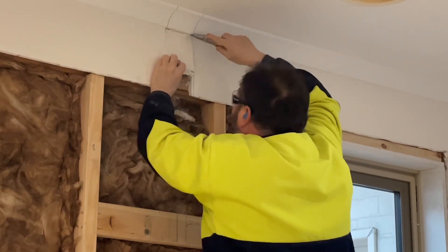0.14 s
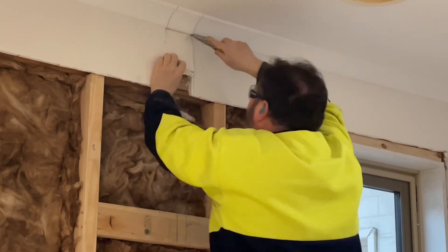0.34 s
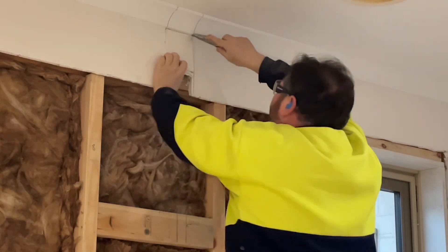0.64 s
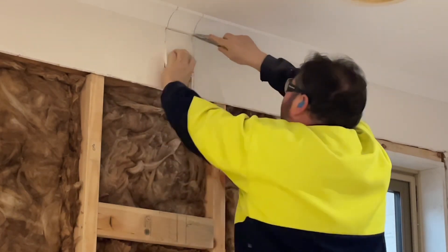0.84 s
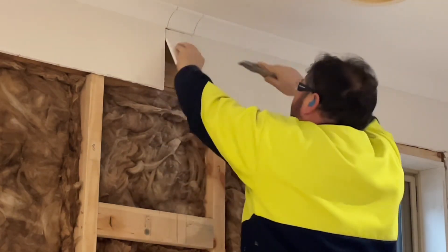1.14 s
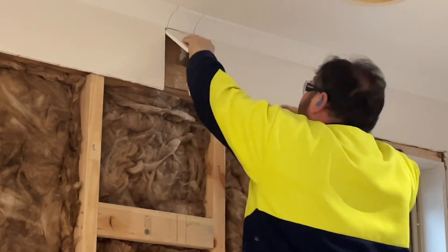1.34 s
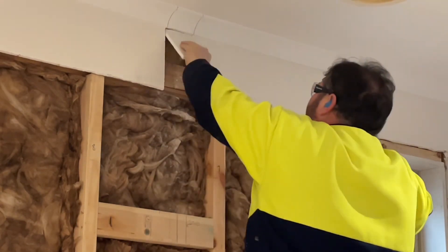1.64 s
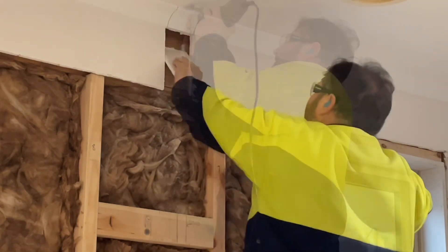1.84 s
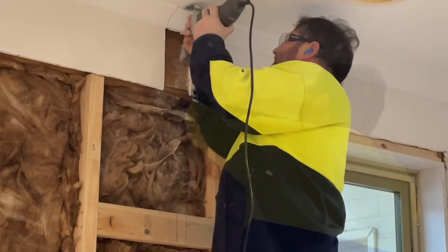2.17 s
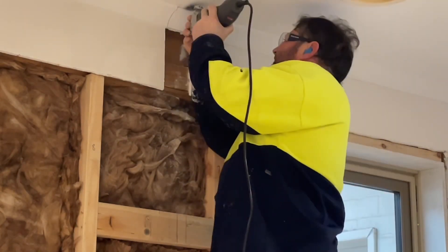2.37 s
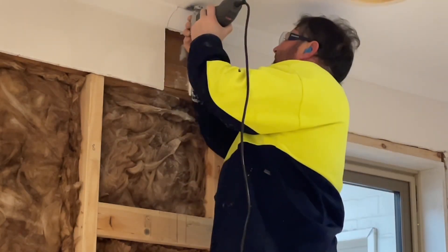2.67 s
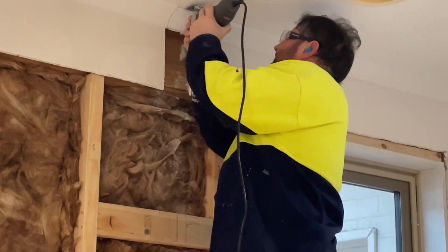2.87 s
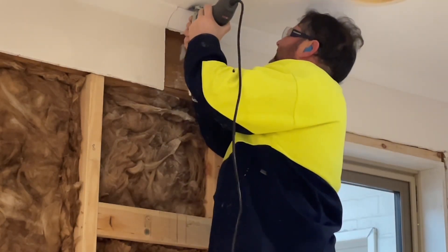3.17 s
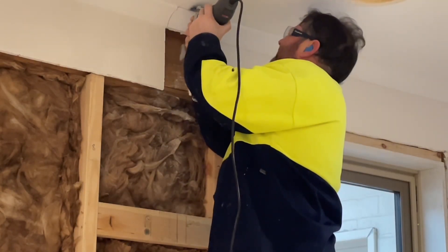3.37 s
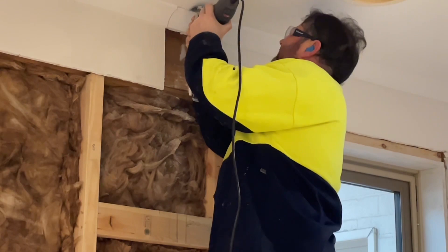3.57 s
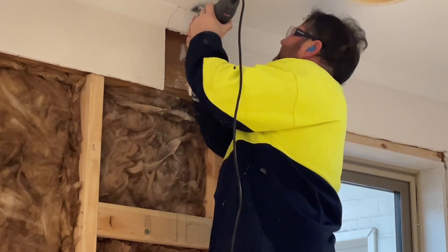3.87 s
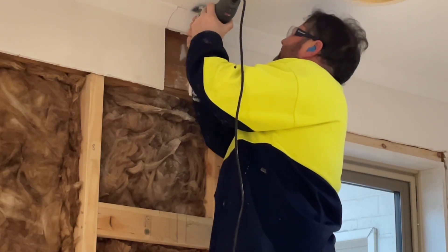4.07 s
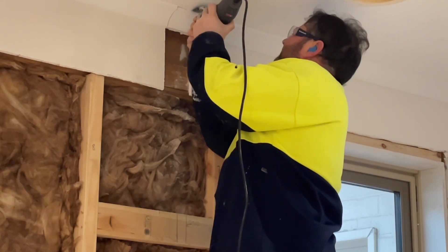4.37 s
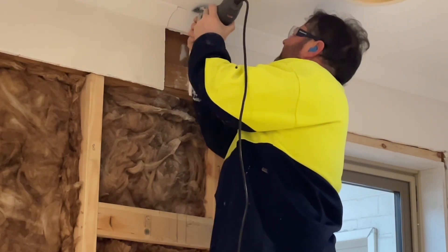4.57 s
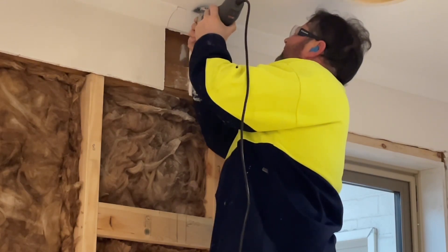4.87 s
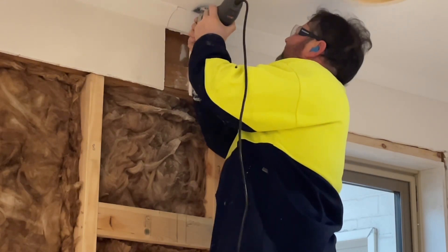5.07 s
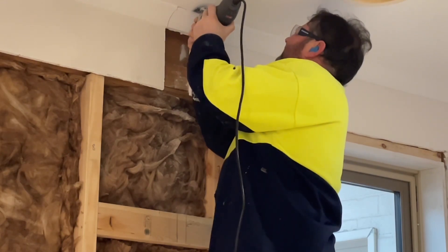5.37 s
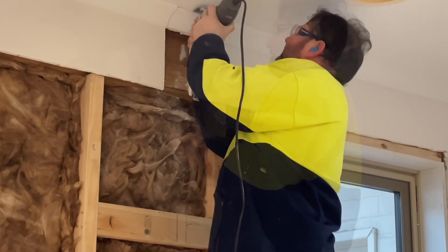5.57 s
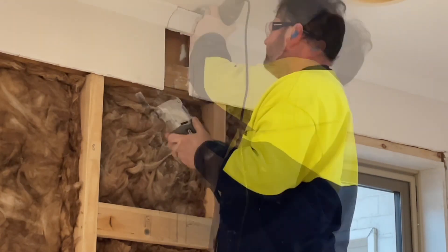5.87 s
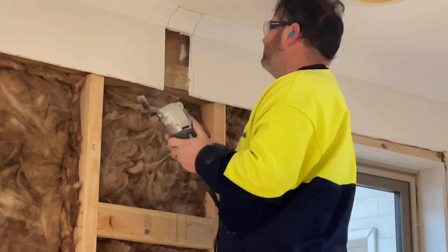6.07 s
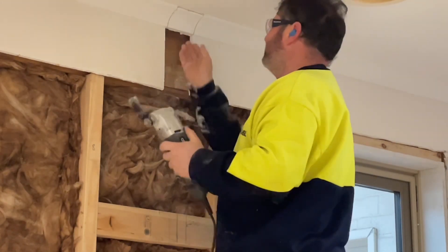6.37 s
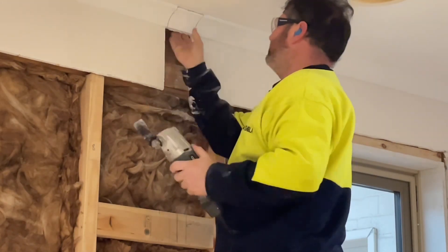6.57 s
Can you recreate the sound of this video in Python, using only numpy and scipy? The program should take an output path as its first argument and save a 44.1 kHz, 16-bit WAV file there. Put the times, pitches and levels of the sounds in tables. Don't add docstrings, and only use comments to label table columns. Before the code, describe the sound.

Close stereo pickup of wall work: very soft scraping and little knocks, then a sudden brittle snap and boomy clatter against the wall cavity. It blends straight into a loud, steady, nasal power tool buzz with crumbling grit and flickering overtones. Near the end the motor coasts down, duller and lower, still sounding at the cut-off, with short room reflections.

```python
import sys
import numpy as np
from scipy import signal
from scipy.fft import rfft, irfft, next_fast_len
from scipy.io import wavfile
from scipy.ndimage import uniform_filter1d, map_coordinates

SR = 44100
rng = np.random.default_rng(int(sys.argv[2]) if len(sys.argv) > 2 else 0)


def field_ratio(decibels):
    return 10 ** (np.asarray(decibels, dtype=float) / 20)


def to_wav(s):
    ch = np.atleast_2d(s).T
    pcm = np.round(np.clip(ch, -1, 1) * 32767)
    wavfile.write(sys.argv[1], SR, pcm.astype(np.int16))


N = 296263
STEP = 64
TIME = np.arange(N)
ON_S, OFF_S = 1.767, 5.965
FREE_HZ = 278

# t/s, level/dB
ROOM_LEVEL = [(0, -51.5), (.5, -55), (1, -54), (1.7, -51.5), (2.2, -67), (5.8, -66.5), (6.1, -58.5),
              (6.72, -62)]
# f/Hz, level/dB per Hz
RUMBLE_COLOUR = [(15, -26), (30, -20), (60, -3.5), (100, -3.5), (160, -13), (260, -13), (380, -16),
                 (480, -21.5), (700, -34.5), (1200, -60)]
# f/Hz, level/dB per Hz
HISS_COLOUR = [(300, -2), (800, 2), (1300, -1), (3600, -2.5), (6500, -2), (9000, -2.5), (12000, -17.5),
               (15500, -14)]
# f/Hz, level/dB over the rumble
MACHINE_HUM = [(100, -1.5), (295, -12.5)]
# f/Hz, t60/s
WALL_DECAY = [(200, 0.37), (2000, 0.51), (10000, 0.037)]
# t/s, peak level/dB, f/Hz, t60/s
BOARD_TICKS = [(0.189, -45, 708, 0.015), (0.213, -41, 2610, 0.012), (0.224, -44, 750, 0.028),
               (0.853, -36, 3500, 0.012), (0.906, -38, 1920, 0.022), (0.913, -38, 2900, 0.012),
               (0.92, -44, 1510, .015), (1.215, -45, 821, 0.012), (1.464, -40, 1650, 0.014),
               (1.708, -22, 1570, 0.012), (1.716, -13.5, 1250, 0.014), (1.729, -12.5, 820, 0.0098),
               (1.744, -21, 1110, 0.018), (1.755, -22.5, 1280, 0.011), (1.993, -29, 337, 0.059)]
# t/s, hiss level/dB, scrape level/dB, rise/s, t60/s
DRY_RUBS = [
    (0.613, -43.5, -65, 0.018, 0.37),
    (.85, -66, -50.5, .003, 0.11),
    (.905, -64, -56.5, .006, 0.61),
    (.215, -68, -51, 0.0046, .14),
    (1.1, -72, -66, .02, .3),
    (1.21, -70, -54, .01, 0.33),
    (1.46, -72, -52, .005, .15),
    (1.713, -43, -37, 0.0014, 0.33),
]
# f/Hz, level/dB per Hz
SKIN_COLOUR = [(800, -17), (2000, -7), (3500, -3.5), (7000, -1), (11000, -1), (15000, -8)]
# f/Hz, level/dB per Hz
EDGE_COLOUR = [(200, -6), (700, 6), (1300, -4), (2400, -3), (3500, -4.5), (8000, -27)]
# t/s, peak level/dB
PIECE_THUDS = [(0.62, -57), (0.916, -41), (1.721, -30), (1.737, -16.5), (1.762, -13.5), (1.771, -24),
               (1.78, -16.5), (1.791, -17.5), (1.81, -18.5), (1.83, -20), (1.847, -39), (1.877, -43),
               (1.995, -29), (2.019, -56)]
# f/Hz, width/Hz, level/dB
CAVITY_MODES = [(95, 73, -13), (168.6, 18, 5.5), (257, 28, -0.5), (384, 100, -6.5), (560, 110, -14.5)]
# f/Hz, level/dB
STROKE_COLOUR = [(500, -21), (800, -5.5), (1100, -12), (1400, -7), (1650, -6.5), (1900, -4.5), (2170, 0.5),
                 (2440, -1.5), (2710, 1.5), (3000, -5.5), (4000, -4), (5100, -6.5), (5600, -11.5),
                 (10000, -13.5)]
# f/Hz, level/dB
GRIT_COLOUR = [(200, -26), (450, -12.5), (750, 0.5), (1300, -6), (2200, -1.5), (3600, -1), (5000, -0.5),
               (6500, -3.5), (9000, -5), (10500, -8.5), (12500, -14), (15500, -12.5)]
# f/Hz, width/Hz, level/dB
HOUSING_RINGS = [(8200, 50, -61), (10200, 50, -66), (11100, 50, -70)]
# t/s, strokes f/Hz
MOTOR_SPEED = [(1.8, 278.1), (2.01, 277.0), (2.39, 270.8), (2.73, 272.9), (2.93, 275.5), (3.62, 270.7),
               (3.79, 269.7), (3.99, 266.1), (4.22, 266.6), (4.35, 267.7), (4.53, 267.6), (4.79, 269.4),
               (5.11, 265.5), (5.22, 267.1), (5.36, 271.5), (5.96, 277.7)]
# t/s, level/dB, rasp level/dB
BLADE_PUSH = [(1.8, -34, 1.5), (1.84, -43.5, 4), (1.95, -33, -1.5), (2.26, -27, 0.5), (3.03, -27.5, 1),
              (3.09, -26.5, -0.5), (3.2, -26.5, -1.5), (4.21, -26, -1.5), (4.28, -26, -2.5),
              (4.91, -27, -0.5), (5.06, -25.5, 0), (5.22, -28.5, 1.5), (5.52, -25.5, 0),
              (5.65, -28.5, -1.5), (6.04, -26, -1), (6.29, -32.5, 4.5), (6.37, -33.5, -1.5),
              (6.72, -37, -1)]
# t/s, length/s, gain level/dB
BLADE_BITES = [(2.166, 0.068, 3), (2.29, 0.078, 3.5), (2.651, 0.17, 3), (3.1, 0.21, 3.5),
               (3.596, 0.57, 2.5), (3.995, 0.11, 3), (4.2, .14, 5), (4.755, 0.12, 3), (4.976, 0.055, 2.5),
               (5.155, 0.04, 1.5), (5.492, 0.067, -1.5), (6.09, 0.09, 1), (6.235, 0.092, 3.5)]
SINGING_OVERTONES = [2, 4, 5, 6, 8, 9, 10, 11, 13, 14, 15, 16, 18, 19]
# t/s, length/s, gain level/dB
SINGING_MOMENTS = [
    [(5.045, 0.59, 11.5)],
    [(5.35, 0.49, 8.5), (6.12, 0.34, 10.5)],
    [(3.075, 0.96, 7.5)],
    [(3.07, 0.27, 9), (3.6, 0.18, 8), (4.76, .23, 7.5), (5.08, 0.13, 9), (5.5, 0.076, 12)],
    [(1.84, 0.31, -15), (2.507, 0.23, 5), (3.19, 0.29, 6.5), (3.66, 0.27, 7), (4.45, 0.28, -3),
     (4.72, 0.16, 8), (5.03, 0.27, 8.5), (6.06, 0.068, 9)],
    [(5.85, 0.24, 9.5), (6.085, 0.053, 9.5)],
    [(2.03, 0.52, 4), (5.4, 0.33, -13)],
    [(5.7, 0.55, -7)],
    [(2, .24, 1.5), (5.64, 0.15, 12.5)],
    [(3.54, 0.21, 11)],
    [(2.44, 0.43, 10.5)],
    [(5.917, 0.26, 9.5)],
    [(5.849, .2, 7.5)],
    [(3.986, 0.33, 9.5), (4.8, 0.74, 11)],
]
# f/Hz, left-right likeness
PORT_LIKENESS = [(60, 0.97), (250, 0.77), (700, 0.57), (1000, 0.033), (1400, 0.92), (1800, 0.22),
                 (2300, 0.81), (2700, 1), (6000, 1), (7200, 0.93), (8200, 1), (9700, 0.85), (11300, 1),
                 (13100, 0.55), (14300, 0.96)]
# f/Hz, half turns
PORT_LEAD = [(0, 0), (6150, 0), (7200, .5), (7750, 1), (8750, 1), (9800, 1.5), (10700, 2), (12200, 2),
             (13000, 2.5), (13900, 3), (15400, 3), (15800, 3.1), (17000, 3.5)]


def unit(x):
    return x / np.sqrt(np.mean(x ** 2) + 1e-20)


def along(points, hz):
    f, v = np.transpose(points)
    return np.interp(np.log(hz + 1), np.log(f + 1), v)


def curves(rows):
    s, *cols = np.transpose(rows)
    return [np.interp(TIME / SR, s, c) for c in cols]


def wobble(rate):
    return map_coordinates(rng.standard_normal(400), [np.arange(0, N + STEP, STEP) * rate / SR])


def full(coarse):
    return np.interp(TIME, np.arange(len(coarse)) * STEP, coarse)


def bumps(s, length, t):
    return 1 / (1 + ((t - s) / (length / 2)) ** 4)


def filtered(x, response):
    m = next_fast_len(N + SR // 2)
    return irfft(rfft(x, m) * response(np.fft.rfftfreq(m, 1 / SR)), m)[..., :N]


def noise(spectrum):
    return unit(filtered(rng.standard_normal((2, N)), lambda hz: field_ratio(along(spectrum, hz))))


def narrow(modes):
    out = np.zeros(N)
    for centre, width, db in modes:
        line = filtered(rng.standard_normal(N), lambda hz: 1 / (1 + ((hz - centre) / width) ** 2))
        out += field_ratio(db) * unit(line)
    return out


def patchy(x, depth_db):
    z = signal.stft(x, nperseg=512)[2]
    field = uniform_filter1d(rng.standard_normal(z.shape[1:]), size=3, axis=0)
    field = uniform_filter1d(field, size=10, axis=1)
    return signal.istft(z * field_ratio(depth_db * unit(field)), nperseg=512)[1][:, :N]


def background():
    t = TIME / SR
    rumble_db, = curves(ROOM_LEVEL)
    hiss_db = -58 + 1.74 * np.minimum(t, 1.7)
    hum = np.zeros(N)
    for hz, db in MACHINE_HUM:
        rise_db = (hz > 200) * 8.5 * np.minimum(t, 1.2)
        level = field_ratio(db + rise_db + full(2.4 * wobble(5.3)))
        hum += level * np.sin(2 * np.pi * hz * t + full(1.03 * wobble(3.92)))
    low = noise(RUMBLE_COLOUR) * full(field_ratio(0.86 * wobble(12.0))) + hum * [[1], [.2]]
    return field_ratio(rumble_db) * low + field_ratio(hiss_db) * noise(HISS_COLOUR)


def walls(x):
    hz, t, z = signal.stft(rng.standard_normal((2, SR // 2)), SR, nperseg=256)
    decay = field_ratio(-60 * t / along(WALL_DECAY, hz)[:, None])
    tail = signal.istft(z * decay, SR, nperseg=256)[1]
    delayed = np.pad(x, (300, 0))[None]
    return signal.fftconvolve(delayed, tail / np.linalg.norm(tail[0]), axes=1)[:, :N]


def ticks():
    out, t = np.zeros(N + SR), np.arange(SR // 3) / SR
    for s, db, hz, t60 in BOARD_TICKS:
        ring = 0.58 * np.sin(2 * np.pi * hz * t) * field_ratio(-60 * t / t60)
        crack = 0.84 * rng.standard_normal(len(t)) * field_ratio(-60 * t / 0.011)
        out[round(s * SR):][:len(t)] += field_ratio(db - 0.5) * (ring + crack)
    return filtered(out[:N], lambda f: 1 / (1 + 1j * f / 4500))


def thuds():
    blows = np.zeros(N)
    for s, db in PIECE_THUDS:
        blows[round(s * SR)] = -field_ratio(db + 36)

    def cavity(f):
        total = 0
        for k, (c, w, db) in enumerate(CAVITY_MODES):
            total = total + (-1) ** k * field_ratio(db) * 1j * f * w / (c * c - f * f + 1j * f * w)
        return total

    return filtered(blows, cavity)


def rubs():
    stroke, t = np.zeros((2, N + SR)), np.arange(SR // 3) / SR
    for s, hiss_db, scrape_db, rise, t60 in DRY_RUBS:
        swell = field_ratio(np.array([[hiss_db], [scrape_db]]) - 60 * t / t60) * (1 - np.exp(-t / rise))
        stroke[:, round(s * SR):][:, :len(t)] += swell
    return stroke[0, :N] * noise(SKIN_COLOUR) + stroke[1, :N] * noise(EDGE_COLOUR)


def board():
    return (ticks() + thuds()) * [[1], [.08]] + rubs()


def blade_strokes(hz, turn):
    grid = np.minimum(np.arange(0, N + STEP, STEP), N - 1)
    ripple = rng.standard_normal(200)
    ripple_db = np.interp(grid / SR, [5.95, 6.02], [.5, 3.5])
    singing = dict(zip(SINGING_OVERTONES, SINGING_MOMENTS))
    strokes = np.zeros((2, N))
    for k in range(2, 37):
        line_hz = k * hz[grid]
        wall_db = np.interp(line_hz / 70, np.arange(len(ripple)), ripple) * ripple_db * (k > 5)
        sung_db = sum(db * bumps(s, length, grid / SR) for s, length, db in singing.get(k, []))
        for port in range(2 if k < 8 else 1):
            swell_db = 0.36 * wobble(2.91) + 1.33 * wobble(10) + 2.0 * wobble(45)
            slip = .09 * k * k + 1.4 * wobble(5) + 0.026 * k * wobble(40)
            level = field_ratio(along(STROKE_COLOUR, line_hz) + wall_db + sung_db + swell_db)
            strokes[port] += full(level) * np.cos(k * turn + full(slip))
    return strokes / np.std(strokes[0])


def plaster_grit(turn):
    puffs = 1 + .2 * np.cos(turn) + .45 * np.cos(2 * turn)
    puffs = puffs * full(field_ratio(.5 * wobble(40)))
    crumbs = patchy(rng.standard_normal((2, N)), depth_db=4.0)
    return unit(filtered(puffs * crumbs, lambda f: field_ratio(along(GRIT_COLOUR, f))))


def balance(cut, rasp_db, bite_db, lost):
    parts = [(-3 - 1.5 * lost, 0, 1750),
             (-5 + bite_db - 1 * lost, 1750, 3300),
             (-2 + rasp_db - 7.5 * lost, 3300, 7000),
             (0.5 + 1.2 * rasp_db - 12.5 * lost, 7000, SR)]

    def above(f, edge_hz):
        return 1 / (1 + (edge_hz / (f + 1)) ** 8)

    bands = filtered(cut, lambda f: np.array([[above(f, lo) - above(f, hi)] for _, lo, hi in parts]))
    return sum(field_ratio(db) * band for (db, _, _), band in zip(parts, bands))


def wall_sway(turn, sag_hz, lost):
    t = TIME / SR
    sway_db = -59.5 + .55 * sag_hz - 18 * lost ** 2
    sway_db = sway_db - 5 * np.clip((t - 5.1) / 0.044, 0, 1)
    sway_db = sway_db + 20 * np.log10(np.clip((t - ON_S) / 0.37, .01, 1))
    return field_ratio(sway_db + full(2.2 * wobble(13))) * np.cos(turn)


def saw():
    t = TIME / SR
    coast_s, fade_s = 1.31, 0.11
    lost = np.maximum(t - OFF_S, 0) / coast_s / np.log(2)
    driven_hz, = curves(MOTOR_SPEED)
    sag_hz = FREE_HZ - driven_hz
    hz = driven_hz / 2 ** lost
    turn = 2 * np.pi * np.cumsum(hz) / SR
    level_db, rasp_db = curves(BLADE_PUSH)
    coarse_s = np.minimum(np.arange(0, N + STEP, STEP), N - 1) / SR
    bite_db = full(sum(db * bumps(s, length, coarse_s) for s, length, db in BLADE_BITES))
    grit_db = -6 + 0.1833 * sag_hz - 0.32 * bite_db + 1.5 * (t > OFF_S) + 4 * lost
    cut = blade_strokes(hz, turn) + field_ratio(grit_db) * plaster_grit(turn)
    cut = balance(cut, rasp_db, bite_db, lost)
    sway = wall_sway(turn, sag_hz, lost) * [[1], [.1]]
    housing = narrow(HOUSING_RINGS) * [[1], [0]]
    running = np.clip((t - ON_S) / fade_s, 0, 1)
    return running * (field_ratio(level_db + 2.0) * cut + sway + housing)


def scene():
    tool, hands = saw(), board()
    room = walls(field_ratio(-10) * tool[0] + field_ratio(-6.0) * hands[0])
    return tool + hands + room + background()


def top_cut(x):
    return signal.sosfilt(signal.butter(12, 16510, fs=SR, output="sos"), x)


def record(dry):
    def spread(hz):
        angle = np.arccos(np.clip(along(PORT_LIKENESS, hz), -1, 1)) / 2
        return np.array([np.cos(angle), np.sin(angle)])

    def lead(hz):
        half_turns = np.interp(hz, *np.transpose(PORT_LEAD))
        return np.exp(.5j * np.pi * half_turns * [[-1], [1]]) * (hz < 15800)

    mid, side = filtered(dry, spread)
    ports = np.array([mid + side, mid - side]) * field_ratio([[.25], [-.25]])
    return top_cut(filtered(ports, lead))


dry = scene()
out = record(dry)
to_wav(out)
```